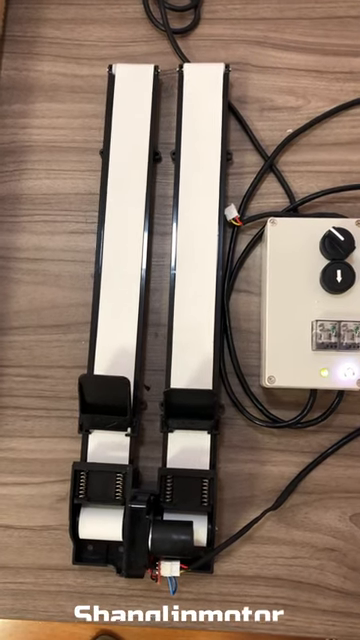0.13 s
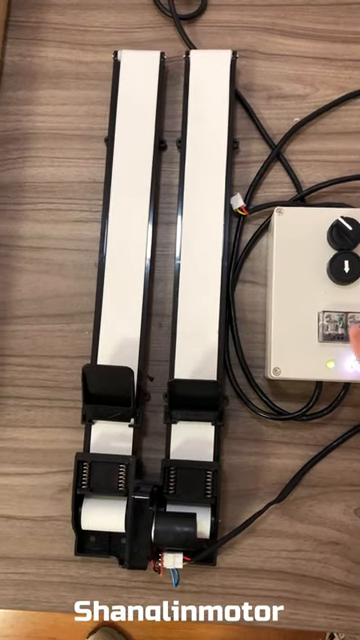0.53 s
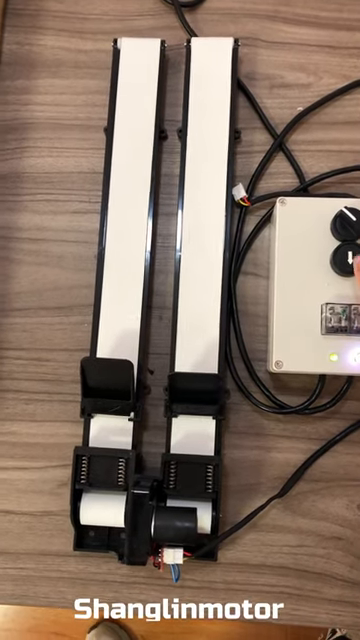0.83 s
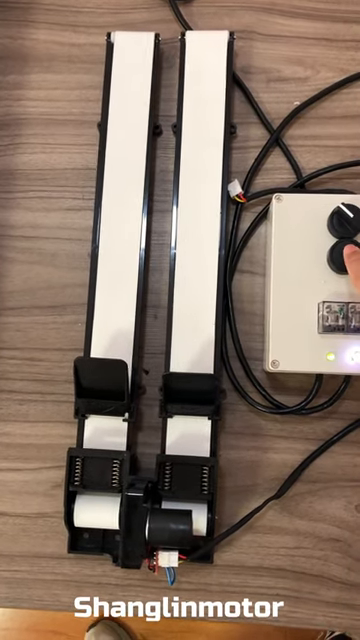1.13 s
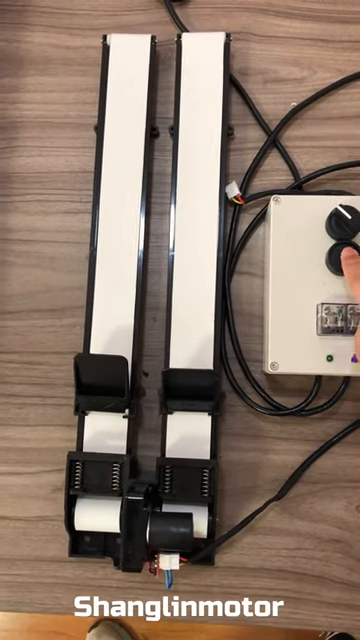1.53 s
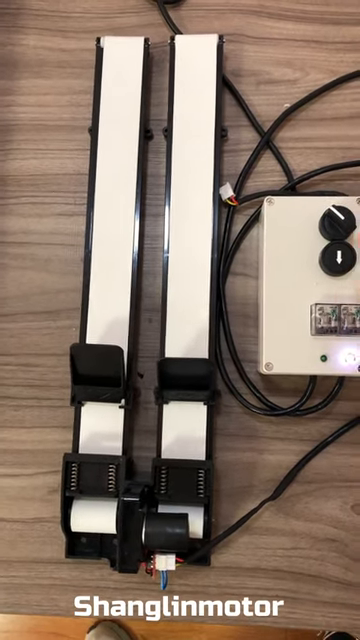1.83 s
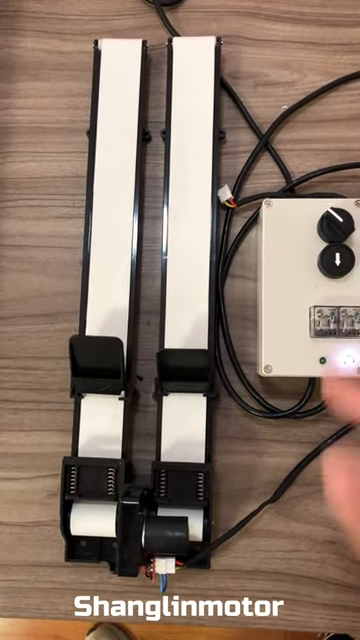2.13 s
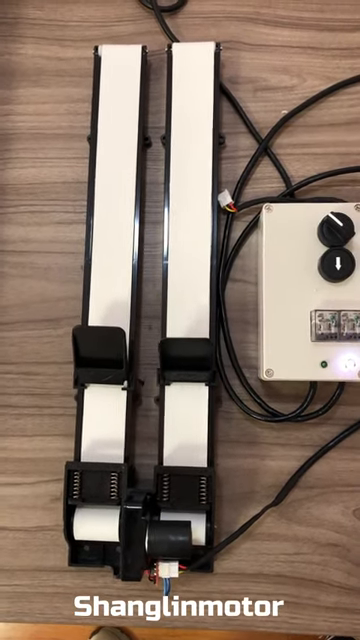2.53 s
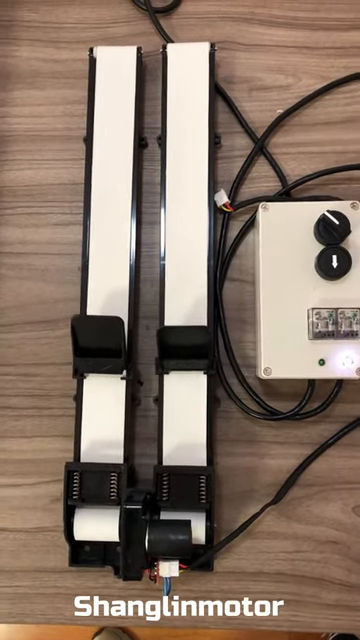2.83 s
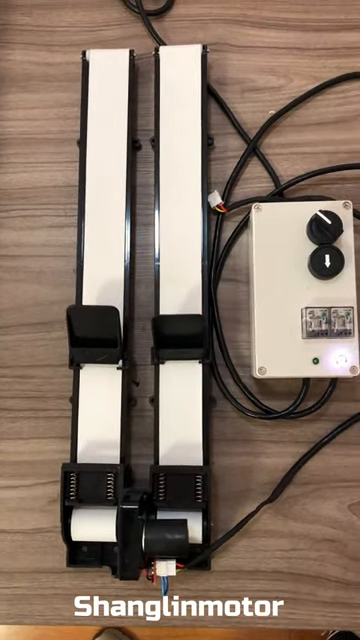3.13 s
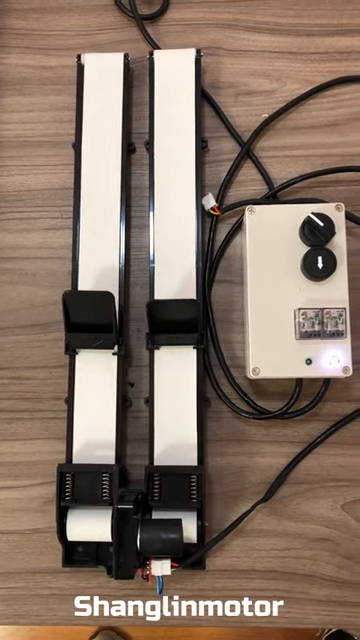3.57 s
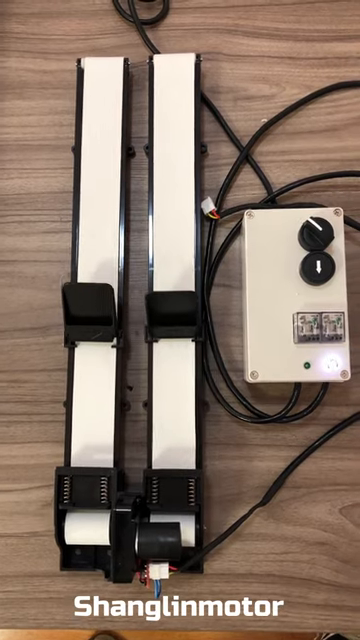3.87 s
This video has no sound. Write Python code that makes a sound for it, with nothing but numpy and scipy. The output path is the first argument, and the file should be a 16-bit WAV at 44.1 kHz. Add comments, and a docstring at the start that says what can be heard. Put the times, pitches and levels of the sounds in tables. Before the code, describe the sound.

A small electric gear motor driving belts on a table: quiet room with faint taps, then a switch click, instant spin-up and continuous buzzing whine with plastic rattle, heard close by a hand-held phone.

```python
"""Small gear motor switched on

A switch clicks and a small motor spins up, heard by a hand-held phone that drifts about.
Its 11-tooth pinion drives a slightly off-centre 42-tooth gear: summed cosines give the whine and its
side tones, and filtered noise gives the rattle in the plastic housing, which throbs once a gear turn.
Shaped noise also makes the brush hiss, clicks, taps, a small rustle, a short echo and the quiet room."""
import sys
import numpy as np
from scipy import signal
from scipy.fft import rfft, irfft
from scipy.io import wavfile
from scipy.ndimage import uniform_filter1d

SR = 44100
rng = np.random.default_rng(int(sys.argv[2]) if len(sys.argv) > 2 else 0)


def dump(signal):
    """Clip the signal to [-1, 1] and save it as 16-bit WAV at the path in sys.argv[1]."""
    limited = np.clip(np.atleast_2d(signal).T, -1, 1)
    pcm = np.round(limited * 32767).astype(np.int16)
    wavfile.write(sys.argv[1], SR, pcm)


def field_ratio(decibels):
    """Amplitude ratio for a level in dB (20 dB per decade); scalars and array-likes work."""
    return 10 ** (np.asarray(decibels, dtype=float) / 20)


N = 176400  # samples, 4 s
PINION_TEETH, GEAR_TEETH = 11, 42
START_S = 1.312  # the motor starts


def level(x, db):
    """Scale to an rms level."""
    return x * field_ratio(db) / np.sqrt(np.mean(x ** 2))


def ring(x, hz, width):
    """A two-pole resonance, gain 1 at its centre."""
    return signal.lfilter(*signal.iirpeak(hz, hz / width, fs=SR), x)


def colour(x, points):
    """Shape the spectrum by (f/Hz, level/dB) points on a log axis, falling away past the ends."""
    hz, db = np.array(points).T
    log_f = np.log(np.arange(N // 2 + 1) * SR / N + 1)
    below = np.maximum(np.log(hz[0]) - log_f, 0)
    above = np.maximum(log_f - np.log(hz[-1]), 0)
    gain_db = np.interp(log_f, np.log(hz), db) - 32 * (below + above)
    return irfft(rfft(x) * field_ratio(gain_db), N)


def walk(rate):
    """Smooth random drift, spread 1, with about rate new values a second."""
    k = int(SR / rate)
    steps = np.repeat(rng.standard_normal(N // k + 1), k)
    smooth = uniform_filter1d(uniform_filter1d(steps, k), k)[:N]
    return smooth / smooth.std()


def fade(t, start, t60):
    """Sudden start, then an exponential decay of 60 dB in t60 seconds."""
    return (t >= start) * field_ratio(-60 * np.maximum(t - start, 0) / t60)


def grit(scatter_db):
    """Noise whose grains differ widely in size."""
    size = uniform_filter1d(rng.exponential(size=N), size=6)
    return rng.standard_normal(N) * field_ratio(scatter_db * size)


# How fast the motor shaft turns as it spins up and runs: t/s, f/Hz (turns per second)
SHAFT_SPEED = [(1.312, 40.0), (1.33, 112.0), (1.342, 128.0), (1.364, 139.5), (1.39, 142.0), (1.45, 142.88),
               (1.55, 143.42), (1.7, 144.45), (1.85, 145.2), (2, 145.45), (2.2, 145.39), (2.4, 144.98),
               (2.6, 144.41), (2.8, 145.1), (3, 145.8), (3.2, 146.66), (3.4, 147.03), (3.6, 146.48),
               (3.8, 147.13), (3.95, 148.02)]


def shaft_speed(t):
    """Shaft turns per second; zero until the motor starts."""
    return np.interp(t, *np.array(SHAFT_SPEED).T) * (t >= START_S)


# What reaches the phone: t/s, whine level/dB, rattle level/dB, phone position (0 first, 1 last)
HEARD_AT_PHONE = [(1.32, -32, -35.5, 0.054), (1.36, -31, -36.5, 0.061), (1.45, -32, -35, 0.047),
                  (1.6, -28, -33, 0.077), (1.95, -36.5, -33.5, 0.26), (2.2, -27, -32.5, 0.35),
                  (2.4, -24, -32, 0.47), (2.6, -20.5, -31, 0.47), (2.85, -24.5, -32, 0.59),
                  (3.1, -23, -32, 0.87), (3.2, -24.5, -32.5, 0.9), (3.4, -24.5, -32, 0.9),
                  (3.6, -28, -32, 1), (3.85, -28.5, -31, 1), (4, -20.5, -32, 0.89)]


def heard_at_phone(t):
    """Whine level, rattle level and phone position, drawn as lines between the table's moments."""
    at, *curves = np.array(HEARD_AT_PHONE).T
    return [np.interp(t, at, curve) for curve in curves]


def at_place(place, dbs):
    """Level in dB as the phone drifts between its first, middle and last positions."""
    return np.interp(place, [0, 0.5, 1], dbs)


def tone(turns, db, shaft, slip):
    """A cosine whose angle follows counted turns, wavering in level and, with the slip, in pitch."""
    order = turns[-1] / shaft[-1]  # cycles per shaft turn
    waver_db = 3 if order < 4.5 else 1.7  # the low hums come and go more
    wavering = field_ratio(db + waver_db * walk(12))
    angle = 2 * np.pi * turns + slip * min(order / PINION_TEETH, 1.3)
    return np.sqrt(2) * wavering * np.cos(angle)  # sqrt 2 makes db an rms level


# Side tones of the whine: gear turns off the mesh rate
SIDE_TURNS = [-3, -2, -1, 1, 2, 3, 5]
# and their level/dB at the first, middle and last phone position
SIDE_LEVELS = [(-60, -85, -75), (-41.5, -41, -61), (-42.5, -38, -45), (-45.5, -37.5, -36), (-55, -70, -61),
               (-47, -47, -46), (-48, -47.5, -40.5)]


def whine(shaft, gear, place, slip, whine_db):
    """Each meeting of teeth gives one cycle; the off-centre gear adds side tones around that rate."""
    mesh = PINION_TEETH * shaft
    out = tone(mesh, whine_db, shaft, slip)
    for k, dbs in zip(SIDE_TURNS, SIDE_LEVELS):
        # the lags, in turns, make the whine swing in time as much as in level
        lag = 0.12 if k < 0 else -0.15 + 0.2 * k + 0.45 * place
        out += tone(mesh + k * gear - lag, at_place(place, dbs), shaft, slip)
    return out


# Tones of the gear: multiples of the gear speed (7.2 is the next gear stage)
GEAR_MULTIPLES = [7.2, 16, 22, 31, 32, 34, 52, 62, 63, 64, 85]
# and their level/dB at the first, middle and last phone position
GEAR_LEVELS = [(-59, -59, -63.5), (-57, -64.5, -73), (-75, -74, -47.5), (-70, -62, -44.5), (-79, -63, -46),
               (-58, -56, -48.5), (-43, -44.5, -70), (-55, -62, -43), (-57, -52, -43), (-56.5, -45, -62),
               (-65, -47, -41)]


def gear_tones(shaft, gear, place, slip):
    """The turning gear hums at multiples of its own speed."""
    return sum(tone(k * gear + rng.random(), at_place(place, dbs), shaft, slip)
               for k, dbs in zip(GEAR_MULTIPLES, GEAR_LEVELS))


# Tones of the motor shaft: whole multiples of the shaft speed
SHAFT_MULTIPLES = [1, 4, 5, 6, 7, 8, 10, 12, 13, 16, 22, 27, 33]
# and their level/dB at the first, middle and last phone position, before the swell of the high ones
SHAFT_LEVELS = [(-62.5, -61, -60.5), (-66, -76, -90), (-65, -74, -52), (-61, -58, -58), (-60, -57.5, -45),
                (-62, -43.5, -36), (-46.5, -41.5, -61), (-42, -43, -33.5), (-39.5, -41.5, -45),
                (-53, -39, -44.5), (-55, -47, -41.5), (-61, -51, -61), (-74, -45.5, -49)]


def shaft_tones(shaft, gear, place, slip):
    """The shaft hums at multiples of its speed; the high ones swell once a gear turn."""
    swell = 1 + 0.89 * np.cos(2 * np.pi * gear)
    out = np.zeros(N)
    for k, dbs in zip(SHAFT_MULTIPLES, SHAFT_LEVELS):
        hum = tone(k * shaft + rng.random(), at_place(place, dbs), shaft, slip)
        out += hum * (swell if k > 20 else 1)
    return out


# Overtones of the spin-up: multiple of the shaft speed, level/dB before they come in and fade
SPIN_UP = [(15, -44), (22, -40.5), (33, -42)]


def spin_up_tones(t, hz, shaft, slip):
    """Overtones that come in as the shaft nears 132 turns a second, then slowly die away."""
    tones = sum(tone(k * shaft, db, shaft, slip) for k, db in SPIN_UP)
    come_in = np.clip(hz / 132, 0, 1) ** 16
    return tones * fade(t, START_S, 2.6) * come_in


# Resonances of the plastic housing: f/Hz, width/Hz (rough, of two resonators in a row),
# level/dB against each other, share of the throb
HOUSING_RESONANCES = [(648, 93, -21, 0.57), (862, 118, -20, 0.28), (1150, 220, -8, 0.23),
                      (1610, 105, 2, 1.1), (1814, 150, 0.5, 0.27), (2353, 160, -2.5, 0.15),
                      (2826, 160, -5.5, 0.37), (3210, 305, -2, 0.82), (4114, 150, -7, 1.02),
                      (4720, 220, -5, 0.88), (5906, 180, -8, 1.15), (6500, 310, -6.5, 1.2),
                      (7250, 240, -8, 1.85), (7890, 980, -13.5, 2.08)]


def tooth_rattle(gear, place, throb):
    """Rough tooth noise, partly alike on every gear turn, rings the housing and throbs with the gear."""
    scatter_db, repeat_share = 3.5, 0.38
    faces = grit(scatter_db)
    worn = faces[(gear % 1 * 1160).astype(int)]  # the same tooth faces come round each turn
    teeth = np.sqrt(1 - repeat_share) * grit(scatter_db) + np.sqrt(repeat_share) * worn
    throb_db = 12.5 * (1 - 0.22 * place) * (throb - 0.5)  # the throb eases as the phone drifts
    out = np.zeros(N)
    for f, width, db, share in HOUSING_RESONANCES:
        shaken = teeth * field_ratio(share * throb_db + 1.2 * walk(5.95))
        rung = ring(ring(shaken, f, 1.43 * width), f, 1.45 * width)
        brighter_db = 2.5 * place if 4000 < f < 5000 else 0  # grows as the phone drifts
        out += field_ratio(db + brighter_db) / np.sqrt(width) * rung
    return level(out, 0)


# Colour of the brush hiss: f/Hz, level/dB (per Hz, against each other)
BRUSH_COLOUR = [(1180, -41), (2000, -18), (3300, -9), (3790, -30), (4780, -11.5), (5250, -11.5),
                (7230, -7.5), (9360, -15), (13800, -9), (15700, -17.5)]


def brush_hiss(shaft, throb):
    """Sparks at the brushes: gritty noise that swells once a shaft turn and a little with the throb."""
    gate = np.exp(3 * (np.cos(2 * np.pi * (shaft + 0.21)) - 1))
    sparks = grit(6) * field_ratio(4.5 * gate + 2.6 * throb)
    return level(colour(sparks, BRUSH_COLOUR), -7)  # dB against the rattle


def motor(t):
    """Turning shaft and gear drive the tones; the gear's tight spot makes the rattle and hiss throb."""
    hz = shaft_speed(t)
    shaft = np.cumsum(hz) / SR  # turns so far
    gear = shaft * PINION_TEETH / GEAR_TEETH + 0.7
    whine_db, rattle_db, place = heard_at_phone(t)
    slip = 0.3 * walk(29.94)  # radians at the mesh rate, shared by all tones
    tones = whine(shaft, gear, place, slip, whine_db) + gear_tones(shaft, gear, place, slip)
    tones += shaft_tones(shaft, gear, place, slip) + spin_up_tones(t, hz, shaft, slip)
    tones *= np.clip(hz / 125, 0, 1) ** 4  # weak until the shaft is fast
    throb = np.exp(0.82 * (np.cos(2 * np.pi * gear) - 1))  # the tight spot of the gear
    noise = tooth_rattle(gear, place, throb) + brush_hiss(shaft, throb)
    return (t >= START_S) * (tones + field_ratio(rattle_db) * noise)


# Switch clicks: t/s, level/dB (at the start, before the tail is added), brightness f/Hz
SWITCH_CLICKS = [(1.3118, -25, 7000)]


def switch_click(t):
    """A burst of broad noise that drops fast, with a weaker, longer tail."""
    out = np.zeros(N)
    for at, db, hz in SWITCH_CLICKS:
        shape = fade(t, at, 0.018) + field_ratio(-14) * fade(t, at, 0.046)
        out += level(ring(rng.standard_normal(N), hz, hz), db) * shape
    return out


# Knock of the gears: f/Hz, peak level/dB, swell t/s, 60 dB decay t/s
GEAR_KNOCK = (1880, -19, .006, .05)


def take_up_knock(t):
    """The slack in the gears is taken up: a sine that swells quickly and dies away."""
    at = 1.329  # s
    hz, db, swell, t60 = GEAR_KNOCK
    shape = np.where(t < at, np.exp(-((t - at) / swell) ** 2), fade(t, at, t60))
    return field_ratio(db) * np.sin(2 * np.pi * hz * t) * shape


# Small taps and ticks: t/s, f/Hz, level/dB (at the start), 60 dB decay t/s
SMALL_TAPS = [(0.197, 900, -43, 0.015), (.266, 9000, -62, 0.035), (.281, 11000, -55, .012),
              (.965, 9500, -76, 0.071), (1.029, 7000, -66, .015), (1.203, 9000, -68, 0.046),
              (1.316, 700, -36.5, 0.13), (1.325, 1630, -24, 0.098)]
# The switch springs back with a bright tick, a plastic clack and soft thumps; same columns
SWITCH_RELEASE = [(1.613, 15500, -27, .05), (1.614, 3100, -29, .03), (1.612, 330, -44, .15),
                  (1.636, 170, -44, .12), (1.63, 680, -42, .08)]


def taps(t):
    """Short bursts of noise, each rung twice through a broad resonance."""
    out = np.zeros(N)
    for at, hz, db, t60 in SMALL_TAPS + SWITCH_RELEASE:
        burst = rng.standard_normal(N) * fade(t, at, t60)
        tap = ring(ring(burst, hz, 0.6 * hz), hz, 0.6 * hz)
        # turns an rms level over the whole scene into one at the start of the tap
        out += level(tap, db) * np.sqrt(t60 * SR / N / (2 * np.log(1000)))
    return out


def add_echo(t, near):
    """A short room echo: a fading noise tail, starting 8.7 ms late, smears the sound."""
    tail = rng.standard_normal(SR // 2) * fade(t[:SR // 2], 0.0087, 0.2)
    tail /= np.sqrt(np.sum(tail ** 2))
    return near + field_ratio(-13) * signal.fftconvolve(near, tail)[:N]


# Colour of the rustle: f/Hz, level/dB (per Hz, against each other)
RUSTLE_COLOUR = [(1800, 3), (2600, -4), (4300, 0), (5500, -7), (8000, -14), (13000, -19), (15500, -20)]


def rustle(t):
    """A small rustle: gritty noise that starts suddenly and fades."""
    return level(colour(grit(7), RUSTLE_COLOUR), -54.5) * fade(t, 0.265, 0.83)


# Colour of the quiet room: f/Hz, level/dB (per Hz, against each other)
ROOM_COLOUR = [(22, -32), (45, -21), (62, -1), (80, -7), (125, -2), (155, -1.5), (204, -9), (260, -6.5),
               (400, -11), (800, -14.5), (1600, -18.5), (2500, -27.5), (3560, -34), (7000, -38.5),
               (12300, -44), (13300, -35), (14600, -41), (15700, -42)]


def room():
    """Steady, mostly low noise whose level drifts a little."""
    return level(colour(rng.standard_normal(N), ROOM_COLOUR), -51.5) * field_ratio(0.84 * walk(3.4))


def scene():
    """The motor and switch with a short room echo, over a rustle and the room's hum."""
    t = np.arange(N) / SR
    near = motor(t) + switch_click(t) + take_up_knock(t) + taps(t)
    return (add_echo(t, near) + rustle(t) + room())[None]


def top_cut(x):
    """Nothing passes above the cut-off."""
    return signal.sosfilt(signal.butter(12, 16890, fs=SR, output="sos"), x)


def record(dry):
    """The phone cuts the top of the sound with a steep low-pass at 15750 Hz."""
    low_pass = signal.ellip(12, 0.2, 90, 15750, fs=SR, output="sos")
    mix = signal.sosfilt(low_pass, dry)
    return top_cut(mix)


dry = scene()
out = record(dry)
dump(out)
```